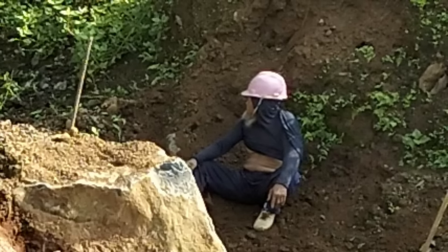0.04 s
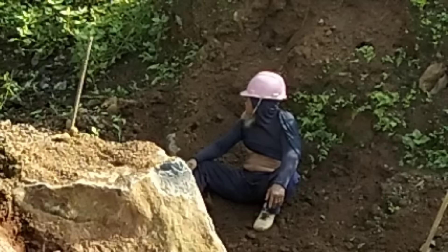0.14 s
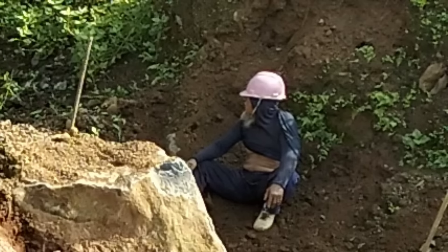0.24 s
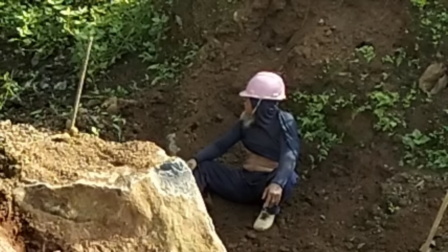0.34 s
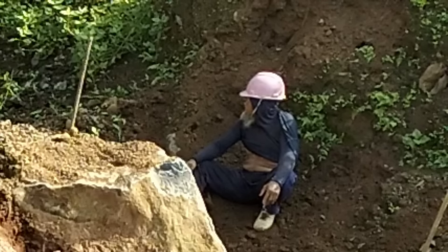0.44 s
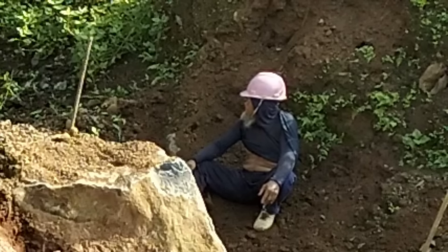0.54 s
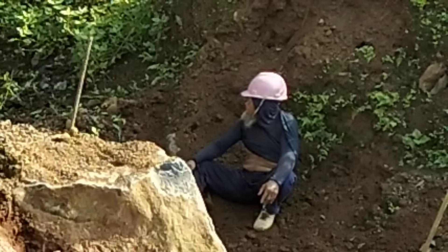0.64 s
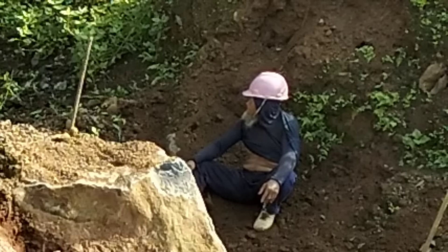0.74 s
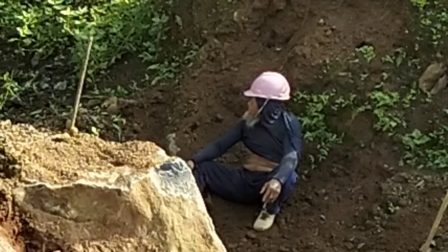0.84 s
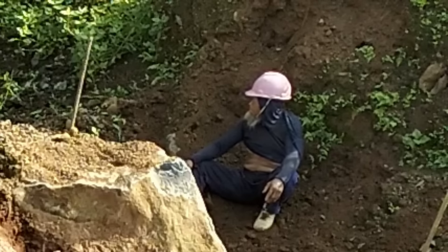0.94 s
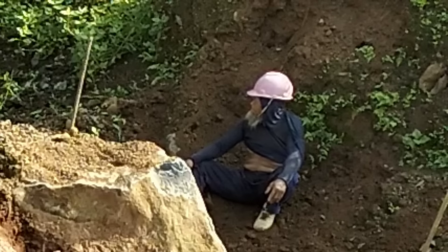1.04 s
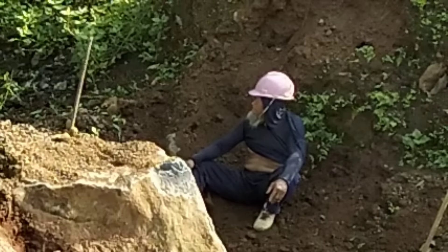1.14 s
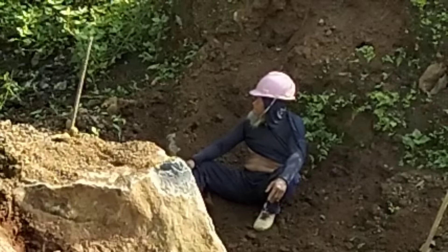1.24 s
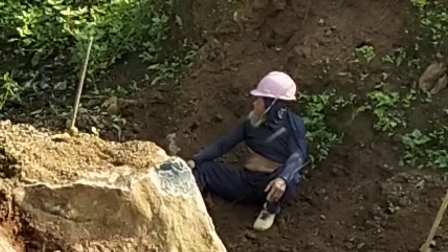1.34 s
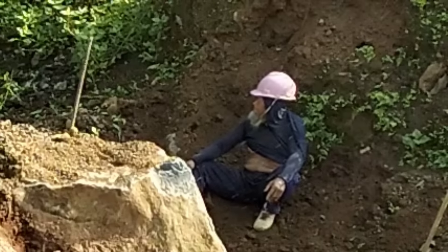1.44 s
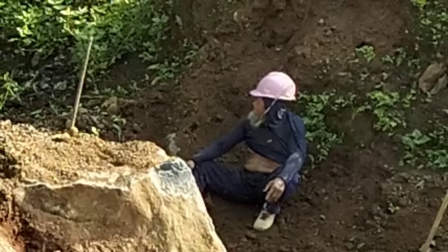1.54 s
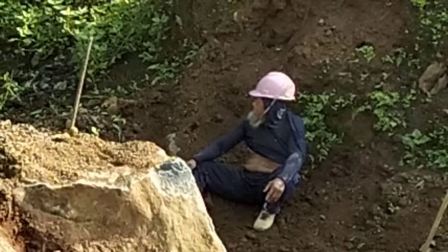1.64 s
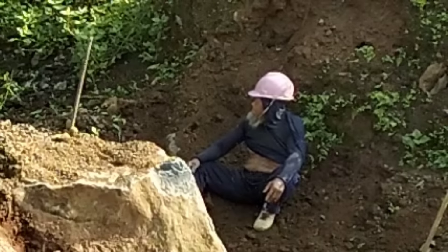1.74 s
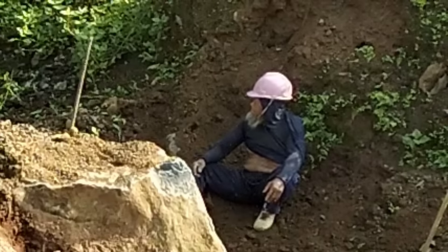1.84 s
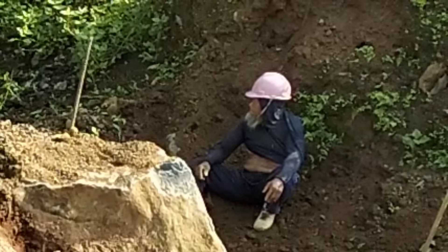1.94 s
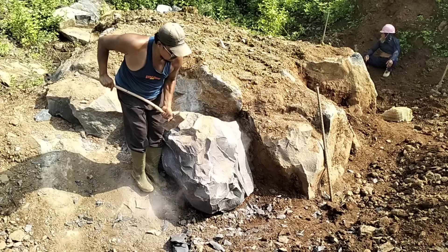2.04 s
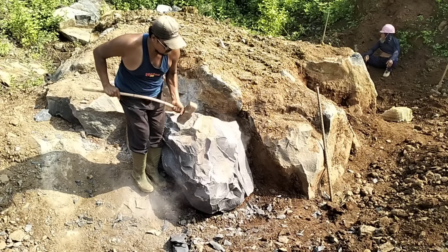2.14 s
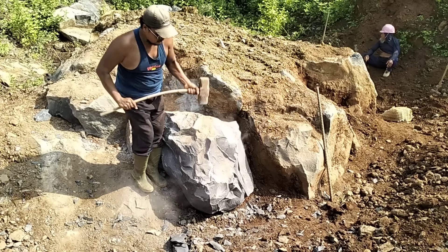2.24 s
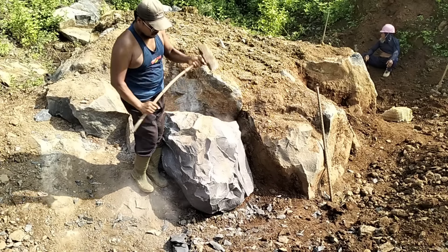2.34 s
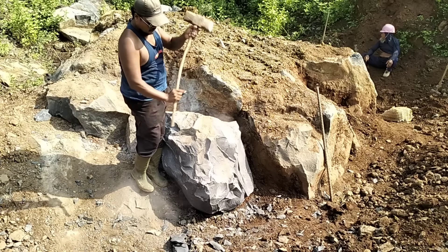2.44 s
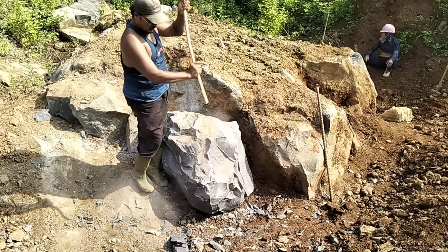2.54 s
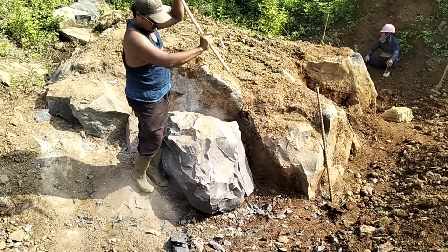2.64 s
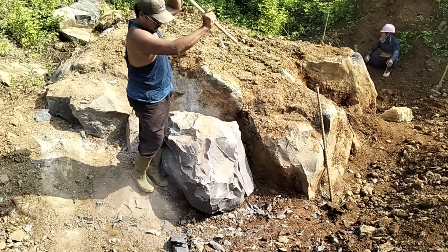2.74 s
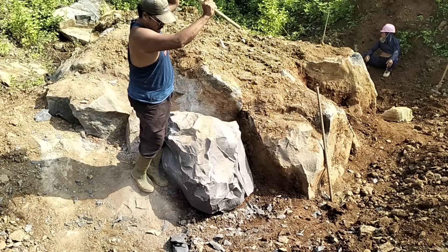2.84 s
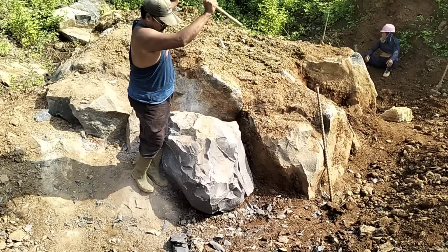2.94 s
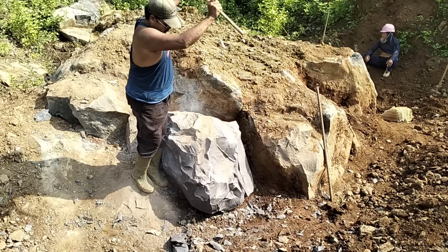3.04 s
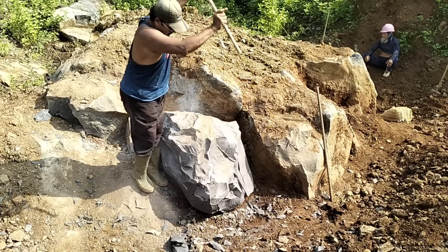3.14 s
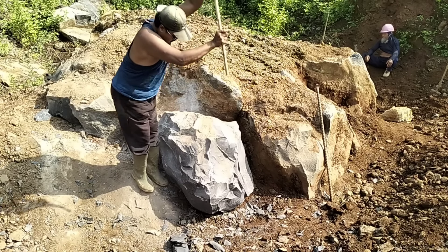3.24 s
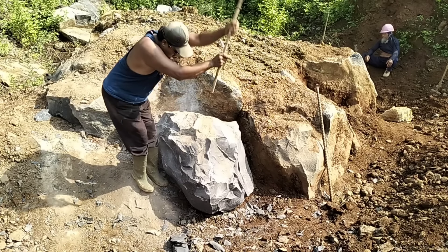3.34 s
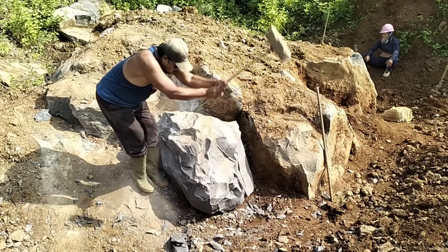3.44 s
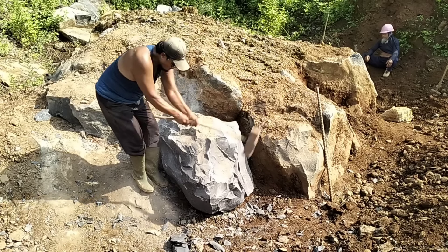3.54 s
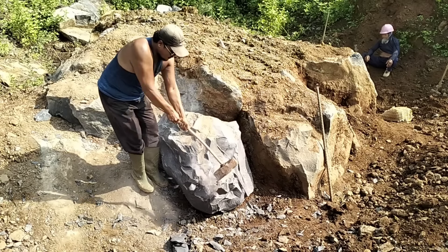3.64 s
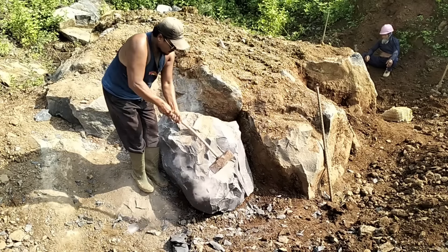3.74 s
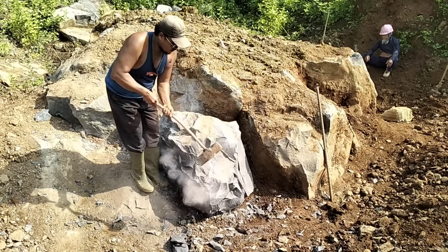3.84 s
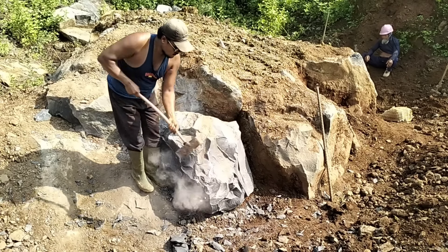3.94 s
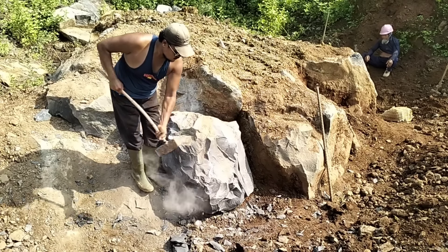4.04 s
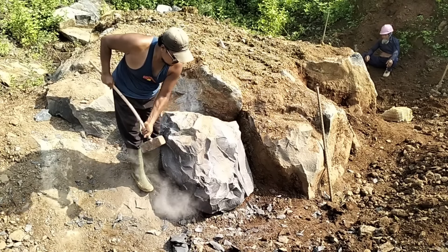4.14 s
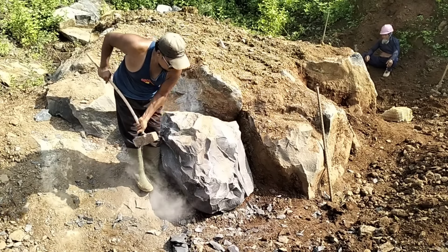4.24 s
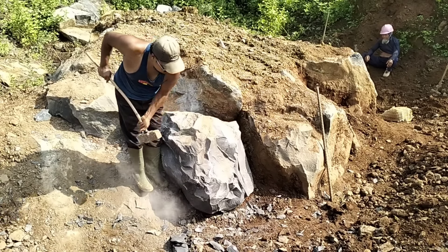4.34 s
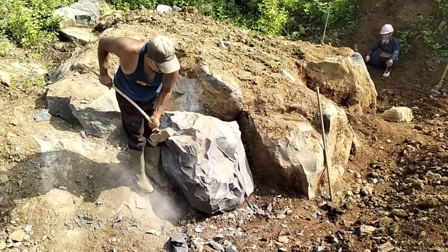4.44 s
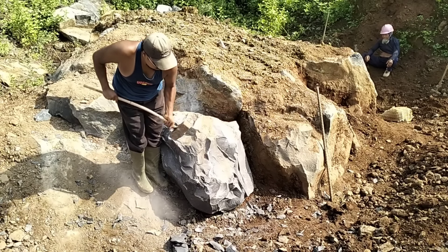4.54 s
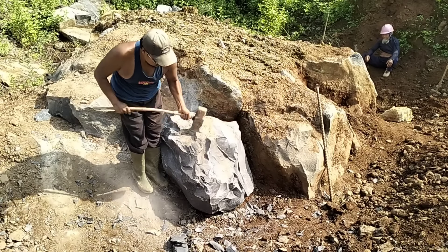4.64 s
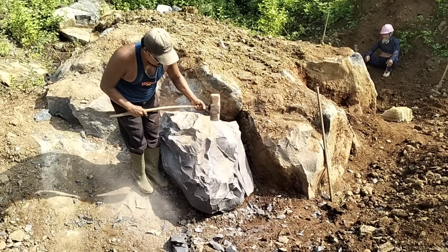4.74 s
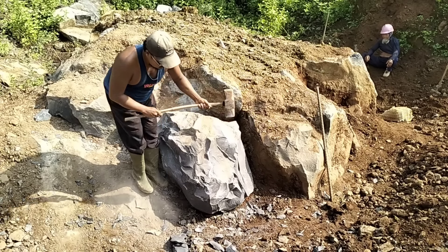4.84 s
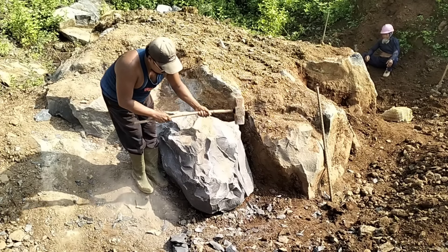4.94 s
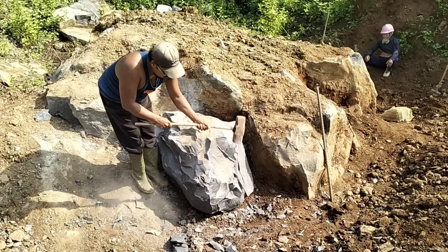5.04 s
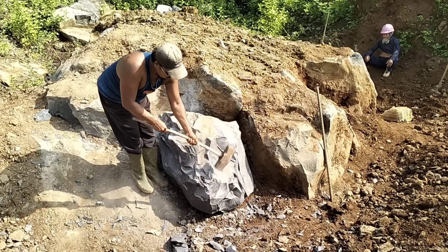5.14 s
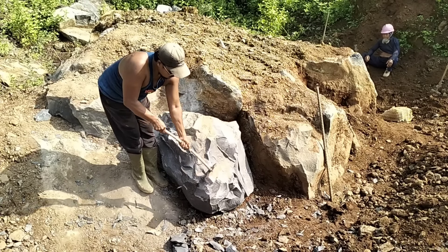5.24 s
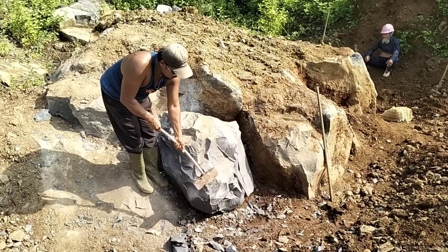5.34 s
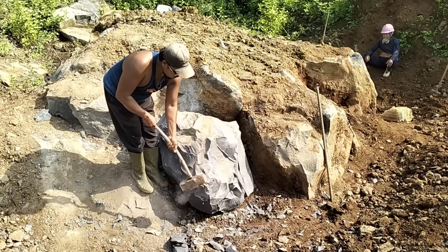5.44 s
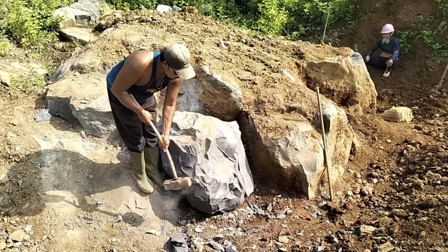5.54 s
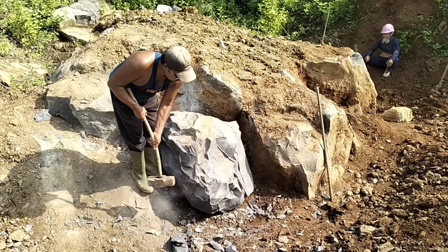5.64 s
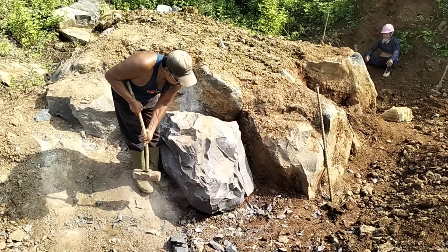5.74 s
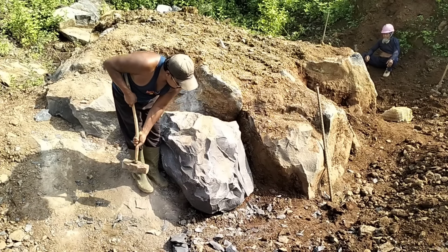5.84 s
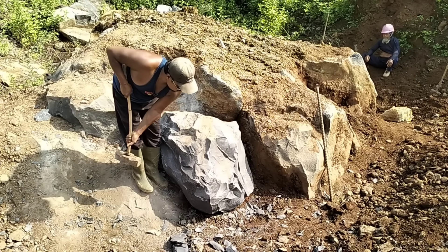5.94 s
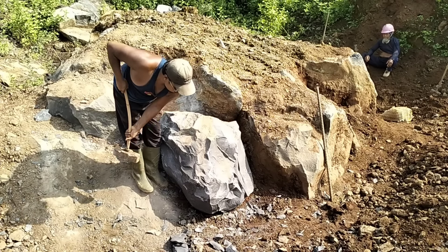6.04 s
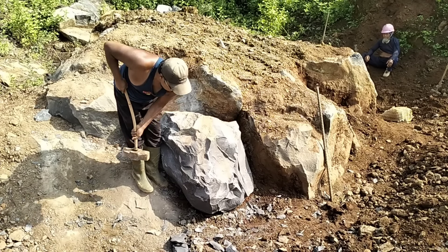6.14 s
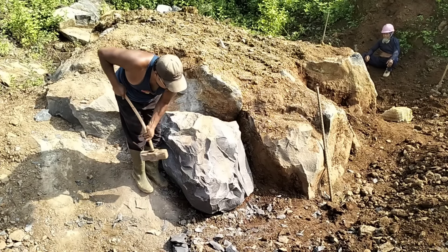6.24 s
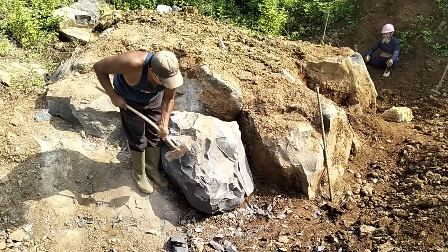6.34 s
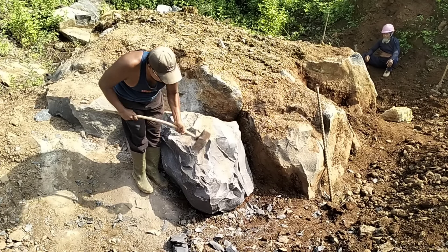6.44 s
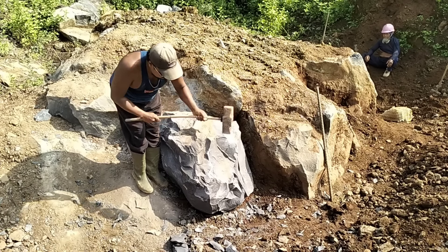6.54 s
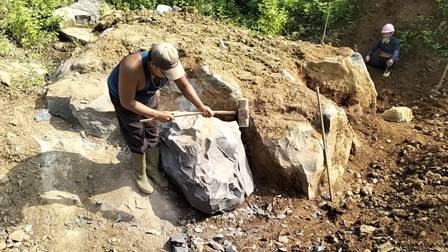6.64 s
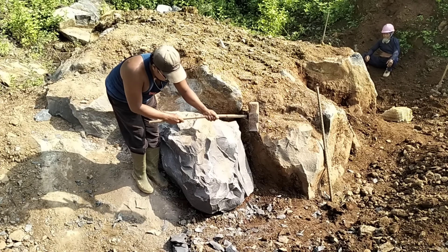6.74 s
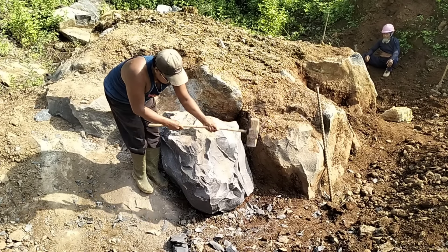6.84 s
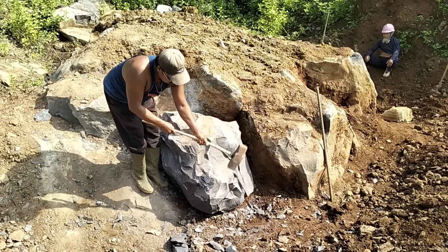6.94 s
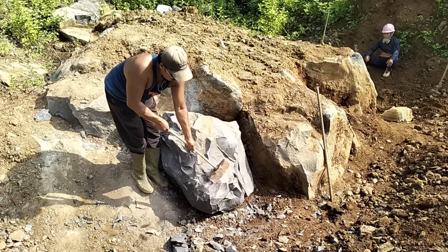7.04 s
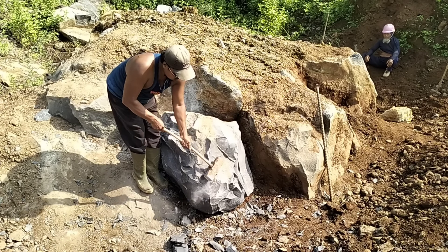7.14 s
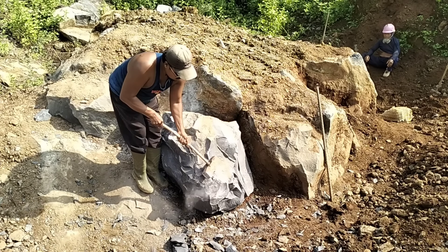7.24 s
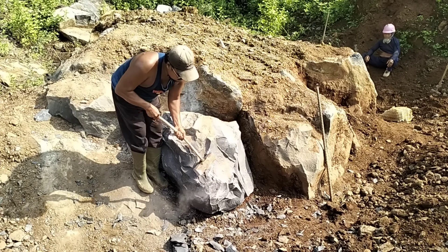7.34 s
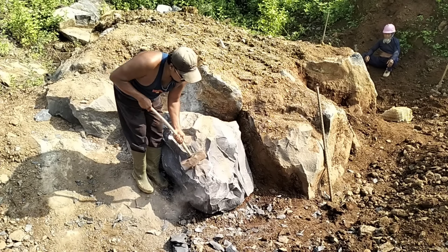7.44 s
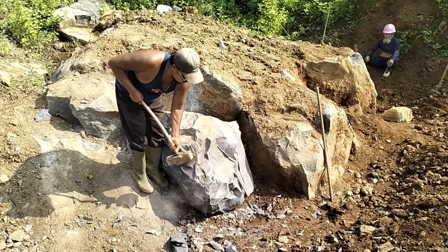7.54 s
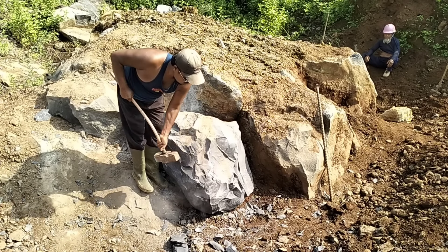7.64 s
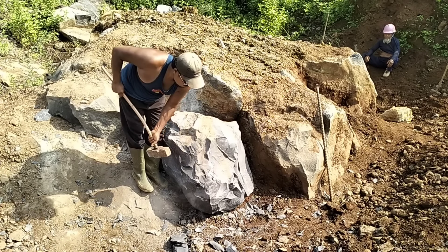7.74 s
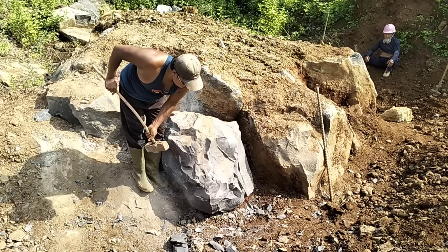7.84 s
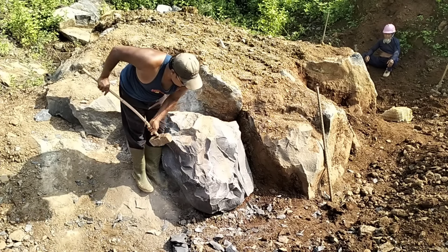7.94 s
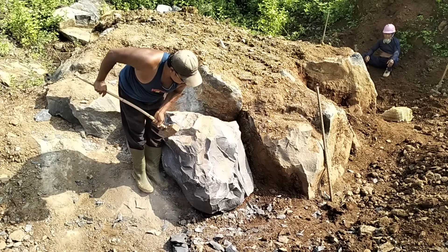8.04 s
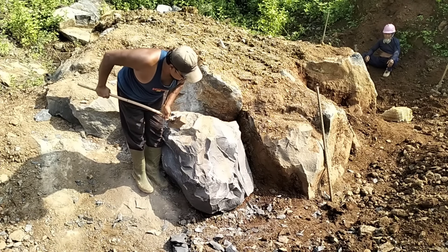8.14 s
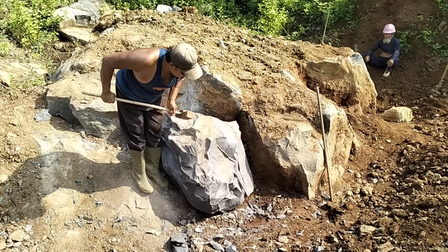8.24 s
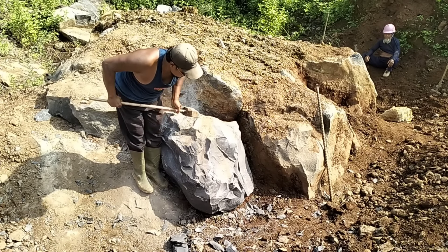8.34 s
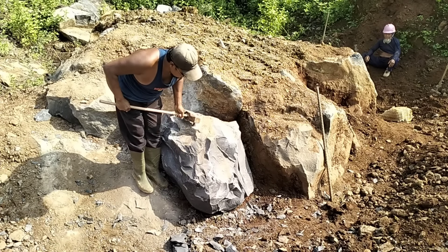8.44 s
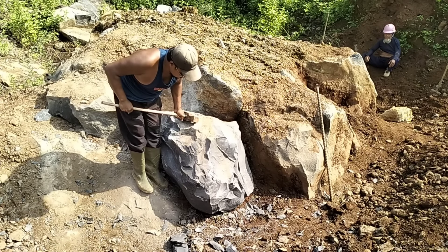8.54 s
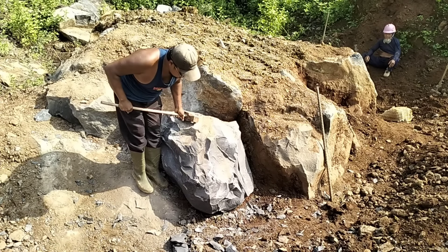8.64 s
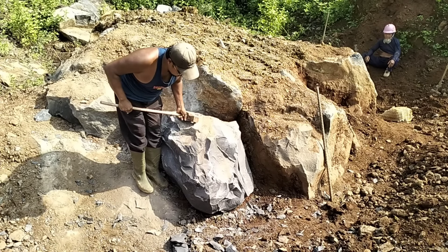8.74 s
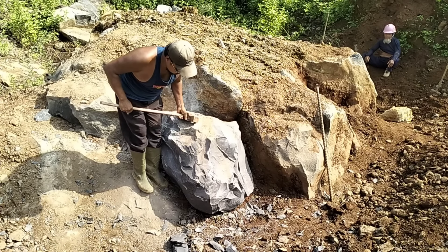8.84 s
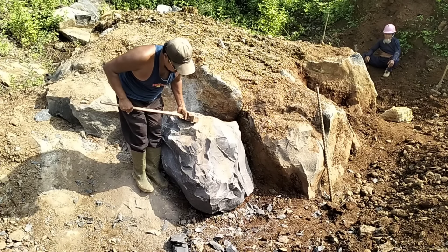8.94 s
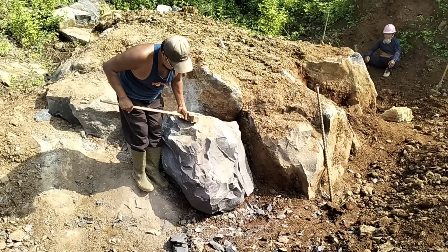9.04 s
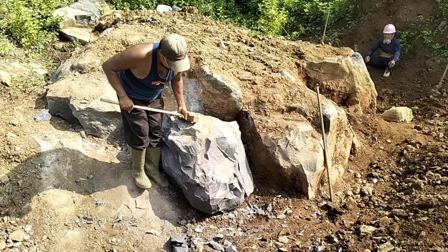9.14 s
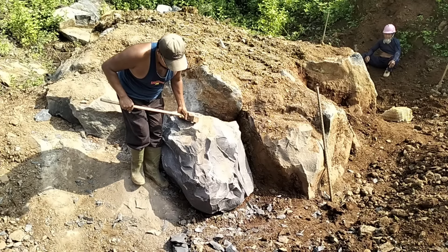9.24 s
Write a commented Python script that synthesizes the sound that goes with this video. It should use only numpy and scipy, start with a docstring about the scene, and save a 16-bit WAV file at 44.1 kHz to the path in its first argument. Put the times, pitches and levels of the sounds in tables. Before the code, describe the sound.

Sledgehammer strikes a boulder outdoors in hard, separate, distorting blows with crunching chips and brief steel ring, over steady cicada hiss and a soft cooing bird.

```python
"""An earth slope with a boulder on it, struck by a sledgehammer, with a rock face further off.
Blows: jagged noise forces drive stone resonances; noise crushes and patters; sines thud and ring as steel.
Falling chips tick and knock through noisy resonances; swings swish and grit slides in swells of noise.
All round, two bands of noise hiss as far cicadas, a bird coos in gliding sines, and something rumbles
far away. Delayed noise tails echo off the slope, and the microphone clips on the blows."""
import sys
import numpy as np
from scipy import signal
from scipy.fft import rfft, irfft, next_fast_len
from scipy.io import wavfile
from scipy.ndimage import uniform_filter1d, map_coordinates

SR = 44100
rng = np.random.default_rng(int(sys.argv[2]) if len(sys.argv) > 2 else 0)


def inscribe(sig):
    """Save sig as 16-bit PCM at rate SR to the path in sys.argv[1].

    A 1-D sig is mono; a 2-D sig holds one channel per row.
    Samples are clipped to [-1, 1] before scaling.
    """
    pcm = np.round(np.clip(np.atleast_2d(sig).T, -1, 1) * 32767)
    wavfile.write(sys.argv[1], SR, pcm.astype(np.int16))


N = 409688
T = np.arange(SR // 2) / SR  # time after a contact, s


def amp(db):
    """Gain of a level in dB."""
    return 10 ** (np.asarray(db) / 20)


def unit(x):
    """x at rms 1."""
    return x / np.sqrt(np.mean(x ** 2, axis=-1, keepdims=True) + 1e-20)


def along(points, hz):
    """Points of (f/Hz, value) read on a log frequency axis."""
    f, v = np.transpose(points)
    return np.interp(np.log(hz + 1), np.log(f + 1), v)


def curves(rows):
    """One value per sample for each column after the time."""
    s, *cols = np.transpose(rows)
    return [np.interp(np.arange(N) / SR, s, c) for c in cols]


def wobble(rate):
    """A smooth random curve, rate knots a second."""
    knots = rng.standard_normal(int(N * rate / SR) + 4)
    return map_coordinates(knots, [np.arange(N) * rate / SR])


def filtered(x, response):
    """x times a complex response of frequency."""
    n = x.shape[-1]
    m = next_fast_len(n + SR // 4)
    return irfft(rfft(x, m) * response(np.fft.rfftfreq(m, 1 / SR)), m)[..., :n]


def resonated(x, hz, width_hz):
    """x through one resonance."""
    return filtered(x, lambda f: 1j * f * width_hz / (hz * hz - f * f + 1j * f * width_hz))


def patchy_noise(spectrum, alike, patchy_db):
    """Stereo noise, its centre at rms 1, with patches of random gain over time and frequency."""
    z = signal.stft(rng.standard_normal((2, N)), nperseg=512)[2]
    field = rng.standard_normal(z.shape)
    field = uniform_filter1d(uniform_filter1d(field, size=8, axis=1), size=12, axis=2)
    a, b = signal.istft(z * amp(patchy_db * field / field.std()), nperseg=512)[1][:, :N]
    # alike sets the correlation of the two sides
    angle = np.arccos(np.clip(alike, -1, 1)) / 2
    left = np.cos(angle) * a + np.sin(angle) * b
    right = np.cos(angle) * a - np.sin(angle) * b
    pair = filtered(np.array([left, right]), lambda hz: amp(along(spectrum, hz)))
    return pair / pair.mean(axis=0).std()


def add(track, s, sound):
    """Lays sound into track from s seconds on."""
    part = track[..., round(s * SR):][..., :sound.shape[-1]]
    part += sound[..., :part.shape[-1]]


# spectra of the two kinds of singer: f/Hz, relative level/dB
LOW_SPECTRUM = [(1000, -60.5), (1700, -32), (2360, -6.5), (2790, -1), (4870, 1.5), (8200, -6), (10700, -33),
                (18000, -120)]
HIGH_SPECTRUM = [(6000, -34.5), (8000, -12.5), (9700, 2), (11800, -3), (13700, -10), (14200, -24.5),
                 (14500, -73.5)]
# swell of the high chorus: t/s, level/dB
HIGH_SWELL = [(0, -38), (3, -35.5), (6.8, -36.5), (9.29, -37.5)]
# dips of the hiss after a blow: t/s, depth/dB, recovery/s
HISS_LULLS = [(1.38, 3, .7), (3.74, 3.5, 0.93), (5.4, 1.5, 0.36)]
LOW_CHORUS_DB, LULL_FALL_S = -34, 0.069


def cicadas():
    """Far singers blur into two bands of hiss; the upper swells on its own and both dip together."""
    high_db, = curves(HIGH_SWELL)
    lull_db = 0
    for s, depth_db, back in HISS_LULLS:
        after = np.maximum(np.arange(N) / SR - s, 0)
        lull_db = lull_db - depth_db * (1 - np.exp(-after / LULL_FALL_S)) * np.exp(-(after / back) ** 2)
    low = amp(LOW_CHORUS_DB) * patchy_noise(LOW_SPECTRUM, alike=0.028, patchy_db=1.18)
    high = amp(high_db + 0.27 * wobble(8)) * patchy_noise(HIGH_SPECTRUM, alike=.02, patchy_db=2.0)
    return amp(lull_db) * (low + high * amp([[-1.2], [1.2]]))


# swell of the far rumble: t/s, level/dB
RUMBLE_SWELL = [(0, -53.5), (5.2, -52), (5.5, -54.5), (9.29, -58)]
# spectra of the rumble and of the air: f/Hz, relative level/dB
RUMBLE_SPECTRUM = [(14, -48.5), (41, -9.5), (75, -5), (135, -2.5), (201, -14), (340, -57), (570, -120)]
AIR_SPECTRUM = [(150, -28.5), (250, -0.5), (1030, -8.5), (1900, -4.5), (2500, -39)]
AIR_DB = -63


def background():
    """Low-band noise rumbles far away under a faint, wide wash of air."""
    rumble_db, = curves(RUMBLE_SWELL)
    rumble = amp(rumble_db) * patchy_noise(RUMBLE_SPECTRUM, alike=.8, patchy_db=1.2)
    return rumble + amp(AIR_DB) * patchy_noise(AIR_SPECTRUM, alike=.06, patchy_db=2.5)


# notes of one phrase: t after its start/s, length/s, start f/Hz, end f/Hz, level before the mix/dB
BIRD_NOTES = [(.01, 0.075, 1015, 1050, -53), (0.092, 0.032, 1047, 1032, -52),
              (0.145, 0.0322, 1030, 1021, -56), (0.223, 0.033, 1063, 1027, -52),
              (.325, .055, 1050, 1165, -55), (.4, 0.12, 1140, 1110, -62.5), (0.565, .065, 1000, 1110, -54),
              (.635, .09, 1010, 1130, -61)]
# phrases: t/s, notes sung
BIRD_PHRASES = [(.685, 7), (3.345, 5), (5.825, 8)]


def bird():
    """A phrase of soft gliding whistles, sung a little differently and to a different length each time."""
    out, waver = np.zeros(N), wobble(40)
    chance = rng.standard_normal((len(BIRD_PHRASES), len(BIRD_NOTES), 2))
    for (start, count), draws in zip(BIRD_PHRASES, chance):
        for note, (louder, sharper) in zip(BIRD_NOTES[:count], draws):
            after, length, start_hz, end_hz, db = note
            u = np.arange(round(length * SR)) / (length * SR)
            pitch = start_hz + (end_hz - start_hz) * np.sin(np.pi * u / 2) ** 2
            drift = waver[round((start + after) * SR):][:len(u)]
            sung = pitch * (1 + .005 * sharper + .007 * drift)
            whistle = np.sin(np.pi * u) ** 0.41 * np.sin(2 * np.pi * np.cumsum(sung) / SR)
            add(out, start + after, amp(db + 0.97 * louder) * whistle)
    return out * amp(2.5 * wobble(45))


# echo of the hillside: f/Hz, t60/s
SLOPE_DECAY = [(100, .26), (600, .2), (2000, .15), (10000, .1)]


def hillside(x, delay):
    """A delayed noise tail answers x, each frequency dying at its own speed."""
    hz, t, z = signal.stft(rng.standard_normal((2, SR // 2)), SR, nperseg=256)
    fading = amp(-60 * t / along(SLOPE_DECAY, hz)[:, None])
    tail = signal.istft(z * fading, SR, nperseg=256)[1]
    late = np.pad(x.mean(axis=0), (round(delay * SR), 0))
    return signal.fftconvolve(late[None], tail / np.linalg.norm(tail[0]), axes=1)[:, :N]


def struck(force, hz, db, t60):
    """One mode driven by a force, peaking at db."""
    mode = resonated(force, hz, np.log(1000) / (np.pi * t60))
    return amp(db) * mode / np.abs(mode).max()


def ringing(modes, rise):
    """Damped modes that all start together and swell over rise seconds."""
    tones = sum(amp(db - 60 * T / t60) * np.sin(2 * np.pi * hz * T) for hz, db, t60 in modes)
    return (1 - np.exp(-T / rise)) * tones


SPLINTERS = 14  # pieces that break off at each blow
SPLINTER_HZ, SPLINTER_OCTAVES, SPLINTER_T60_S = 3640, 1.8, 0.0056  # middle pitch, spread, ring
BREAKING = 2.3  # span of the snapping, in contact times


def splinters(bits, contact):
    """Flakes snap off at scattered moments, each with a short note of its own."""
    when, pitch, size, side = bits.T[..., None]
    t = np.maximum(T[:SR // 8] - BREAKING * contact * when, 0)
    hz = SPLINTER_HZ * 2 ** (SPLINTER_OCTAVES * (pitch - .5))
    notes = amp(-12 * size - 60 * t / SPLINTER_T60_S) * np.sin(2 * np.pi * hz * t)
    left = (notes * amp(3 - 6 * side)).sum(axis=0)
    right = (notes * amp(6 * side - 3)).sum(axis=0)
    return np.pad(np.array([left, right]), ((0, 0), (0, len(T) - SR // 8)))


# blows: t/s, contact/s, lowest knock f/Hz, middle knock f/Hz, edge f/Hz, then levels/dB: slab, knock,
# (knock brightness, dB per octave), clack, crush, dust, thud, ground, lead-in noise, steel families 1, 2, 3
HAMMER_BLOWS = [(1.3401, 0.01, 578, 717.5, 1475, -21, 0, -1, -6.5, -14.5, -17, -7.5, 3, -24.5, -15.5, -37.5, -8.5),
                (3.7170, 0.0029, 623, 1130, 1746, -28.5, 7, -1.5, 2.5, -15, -16.5, -9, -28.5, -21.5, -18.5, -20.5, -25),
                (5.2968, 0.0067, 563, 1148, 1864, -35, -4, -8.5, -7.5, -4.5, -34, -14, -37.5, -42, -29.5, -32, -44),
                (5.355, 0.0039, 592, 1084, 1780, -10.5, 1.5, 7.5, 1, -17, -31, -22, -36, -38.5, -25, -39, -42.5),
                (7.156, 0.0036, 590, 810, 1976, -29.5, -1, -7.5, -6.5, -1.5, -24.5, -5.5, -44, -34, -18.5, -20.5, -19),
                (7.168, 0.0041, 557, 796, 1768, -19.5, -10, -6.5, -9.5, -10.5, -39.5, -32, -41.5, -63, -37.5, -46, -25),
                (8.6039, 0.0082, 480, 835, 1110, -51.5, -5, 3.5, -8.5, -24.5, -39.5, -11, -45, -29.5, -41, -30, -34)]
# lowest and middle knock, pitched by the spot struck: relative level/dB, t60/s
STONE_KNOCKS = [(-5, 0.014), (-6.5, 0.012)]
# a loose slab rings on: f/Hz, relative level/dB, t60/s
SLAB_MODES = [(1690, -1, .09), (1400, 0, .075)]
# crushed rock: f/Hz, relative level/dB
GRIT_SPECTRUM = [(300, -21.5), (1000, -7), (2500, -2.5), (6000, -9.5), (10000, -5.5), (16000, -16.5)]
# body of the boulder: f/Hz, relative level/dB, t60/s
BOULDER_MODES = [(114, 5, 0.13), (180, -2, 0.1), (301, -4, 0.072)]
# soft earth under the boulder: f/Hz, t60/s
EARTH_MODE = (48, 0.071)
# steel head, three families driven differently by where the face lands: f/Hz, relative level/dB, t60/s
STEEL_FAMILIES = [
    [(5329, 0, .14)],
    [(6370, 0, .22), (13900, -5, .15)],
    [(9296, 0, .22), (9360, -5, .19), (8650, -4, .09), (6866, -7, .17), (11230, -10, .22), (3960, 3, .045),
     (3300, 3, .04)],
]
EDGE_T60_S = 0.012  # a thin edge of the stone clacks briefly
PIVOT_HZ = 900  # knock brightness turns about this pitch
SPLINTER_DB = -5.5  # over the crush
TOSSED_S, TOSSED_DB = .058, -11  # tossed grit lands again: flight, level over the dust
TOSSED_HZ, TOSSED_T60_S = 692, .35
STEEL_WAVER_DB = 3.5  # slow random level waver of the steel ring, rms
LEAD_IN_HZ, LEAD_IN_GROWS_S = 850, 0.0067  # brief noise swell just before each contact


def hammer():
    """Each blow knocks and crushes the stone, shakes boulder and ground, and rings the steel."""
    out = np.zeros((2, N))
    noise = rng.standard_normal((len(HAMMER_BLOWS), 7, len(T)))
    shards = rng.random((len(HAMMER_BLOWS), SPLINTERS, 4))
    for blow, z, bits in zip(HAMMER_BLOWS, noise, shards):
        s, contact, low_hz, mid_hz, edge_hz, slab_db, knock_db, bright, clack_db, *rest = blow
        crush_db, dust_db, thud_db, ground_db, lead_in_db, *steel_db = rest
        pressing = np.exp(-(T / contact) ** 2)
        # one jolt, then a jagged force while the face grinds in, a little different on each side
        force = (z[0] + 0.36 * z[4:6]) * pressing
        force[:, 4] = 8
        force = uniform_filter1d(force, size=9)
        clack = struck(force, edge_hz, clack_db, EDGE_T60_S)
        stone = clack + amp(slab_db) * sum(struck(force, *mode) for mode in SLAB_MODES)
        # the bulk of the stone feels only the slower part
        push = uniform_filter1d(force, size=14, mode="constant")
        for hz, (db, t60) in zip((low_hz, mid_hz), STONE_KNOCKS):
            tilt_db = bright * np.log2(hz / PIVOT_HZ)
            stone = stone + struck(push, hz, knock_db + db + tilt_db, t60)

        grit = unit(filtered(z[1:3] + 0.5 * z[3], lambda f: amp(along(GRIT_SPECTRUM, f))))
        crush = (1 - np.exp(-T / 0.00067)) * amp(crush_db) * pressing * grit
        crush += amp(crush_db + SPLINTER_DB) * splinters(bits, contact)
        # broken bits patter down unevenly, duller than the crack
        uneven_db = 1.7 * unit(uniform_filter1d(z[0], size=150))
        patter = amp(dust_db - 60 * T / 0.13 + uneven_db)
        crush += patter * unit(resonated(grit[:, ::-1], 1600, 3400))
        late = np.maximum(T - TOSSED_S, 0)
        uneven_db = 2.5 * unit(uniform_filter1d(z[3], size=300))
        shower = amp(dust_db + TOSSED_DB - 60 * late / TOSSED_T60_S + uneven_db)
        shower = shower * (1 - np.exp(-late / 0.017))
        crush += shower * unit(resonated(z[4:6, ::-1] + z[6], TOSSED_HZ, 1500))

        thud = amp(thud_db) * ringing(BOULDER_MODES, rise=0.0098)
        # the earth yields slowly, its phase set back differently on each side
        earth_hz, earth_t60 = EARTH_MODE
        ground = amp(ground_db - 60 * T / earth_t60) * (1 - np.exp(-T / 0.006))
        ground = ground * np.sin(2 * np.pi * earth_hz * (T - np.array([[.0085], [.005]])))
        steel = 0
        for level, family, draw in zip(steel_db, STEEL_FAMILIES, z[1:4, ::-1]):
            waver = unit(uniform_filter1d(uniform_filter1d(draw, size=400), size=400))
            steel = steel + amp(level + STEEL_WAVER_DB * waver) * ringing(family, rise=0.0099)
        add(out, s, stone + crush + thud + ground * amp([[-4], [4]]) + steel * amp([[-1.5], [1.5]]))
        # the lead-in swells up to the contact and stops there
        lead_in = unit(resonated(z[6], LEAD_IN_HZ, LEAD_IN_HZ)) * np.exp(-T / LEAD_IN_GROWS_S)[::-1]
        add(out, s - len(T) / SR, amp(lead_in_db) * lead_in)
    return out


def knock(noise, hz, t60, width):
    """A jolt and a dying scrape of rough contact through a resonance, width as a share of its pitch."""
    scrape = unit(resonated(noise, hz, width * hz)) * amp(-60 * T / t60) * (1 - np.exp(-T / 0.00029))
    push = np.cos(2 * np.pi * hz * T) * np.exp(-1.5 * width * hz * T) * (1 - np.exp(-4 * hz * T))
    return 0.81 * scrape + 1.2 * push


# short ticks and knocks, one just ahead of a blow: t/s, level/dB, f/Hz, snap level over the tick/dB
TICKS = [(1.799, -47, 377, -11.5), (1.947, -37, 605, 0.5), (3.7129, -19, 1000, -15.5),
         (4.032, -26.5, 386, 7), (4.054, -26, 2094, -5.5), (4.069, -38, 3540, 0), (4.123, -39.5, 660, 3),
         (4.23, -34.5, 3790, 0), (4.446, -34, 550, 3), (4.688, -32.5, 560, 8), (5.053, -35.5, 1200, -3.5),
         (5.303, -10, 2100, -6), (5.56, -37.5, 524, -10), (7.394, -29, 514, -3.5), (7.5445, -16, 1787, -13),
         (7.5493, -15.5, 2000, -21.5), (7.556, -22.5, 2880, -8), (7.5563, -15, 590, -13.5),
         (7.56, -22.5, 100, -32), (7.707, -36.5, 1140, -6), (7.733, -32.5, 1260, -7),
         (7.8332, -27.5, 643, -5), (7.843, -25, 400, -17.5), (8.626, -26, 1450, -20)]
LUMP_T60_S, LUMP_HZ, SHORTENS = 0.05, 501, 0.36  # ring at that pitch; power by which higher ones die sooner
PING_HZ, PING_T60_S = 3000, .065  # ticks above this pitch are narrow, ringing pings
SNAP_HZ, SNAP_T60_S = 2680, 0.011  # the hard edge of a knock


def chips():
    """Short ticks and knocks: among the knocks the lower ones ring longer, and each snaps; the highest ticks
    are narrow, ringing pings."""
    out = np.zeros((2, N))
    noise = rng.standard_normal((len(TICKS), 2, len(T)))
    sides = rng.normal(0, 1.5, len(TICKS))
    for (s, db, hz, snap_db), z, side in zip(TICKS, noise, sides):
        if hz > PING_HZ:
            tick = knock(z[0], hz, PING_T60_S, width=0.0062)
        else:
            tick = knock(z[0], hz, LUMP_T60_S * (LUMP_HZ / hz) ** SHORTENS, width=0.77)
            tick = tick + amp(snap_db) * knock(z[1], SNAP_HZ, SNAP_T60_S, width=0.44)
        add(out, s, tick * amp([[db + side], [db - side]]))
    return out


# soft swishes of the swing before a blow, grit sliding and the boulder rocking:
# t/s, length/s, level/dB, f/Hz
SWISHES_AND_SLIDES = [(3.516, 0.085, -51, 590), (3.66, 0.082, -50.5, 1016), (4.031, 0.1, -47, 540),
                      (4.195, 0.028, -31.5, 2450), (4.202, 0.016, -26.5, 12680), (7.298, 0.26, -44.5, 90),
                      (7.376, 0.26, -51, 830)]


def swishes_and_slides():
    """Uneven noise swells and fades without a sharp start, in a narrower band when high."""
    out = np.zeros((2, N))
    noise = rng.standard_normal((len(SWISHES_AND_SLIDES), 3, len(T)))
    for (s, length, db, hz), z in zip(SWISHES_AND_SLIDES, noise):
        uneven_db = 2.0 * unit(uniform_filter1d(z[2, ::-1], size=200))
        grains = (z[:2] + 1.9 * z[2]) * amp(uneven_db)
        u = 3 * T / length  # the swell crests a third of the way in
        swell = (u * np.exp(1 - u)) ** 2
        width = (.9 if hz < 3000 else .14) * hz
        band = resonated(resonated(grains, hz, width), hz, 2 * width)
        add(out, s, amp(db) * swell * unit(band))
    return out


NEAR_S, NEAR_DB = .0064, -18  # the slope behind: delay, level
FACE_S, FACE_DB = .075, -24  # a rock face further off: delay, level
SCATTER_HZ, SCATTER_RATE = 300, 900  # broken ground blurs echoes above this pitch, at so many knots a second


def scene():
    """Work in front with its echoes, animals and distance behind."""
    work = hammer() + chips() + swishes_and_slides()
    song = bird() * amp([[-1], [1]])
    far_song = amp(-2) * song + amp(-4) * hillside(song, NEAR_S)
    deep = filtered(work, lambda hz: 1 / (1 + 1j * hz / SCATTER_HZ) ** 2)
    blurred = deep + (work - deep) * unit(wobble(SCATTER_RATE))
    echoes = amp(NEAR_DB) * hillside(blurred, NEAR_S) + amp(FACE_DB) * hillside(deep, FACE_S)
    return work + echoes + far_song + cicadas() + background()


TOP_HZ = 15360  # band limit of the microphone input


def record(dry):
    """The input clips with a rounded knee at full scale and keeps nothing above its band limit."""
    clipped = dry / (1 + np.abs(dry) ** 8) ** (1 / 8)
    return np.clip(filtered(clipped, lambda hz: hz < TOP_HZ), -1, 1)


dry = scene()
out = record(dry)
inscribe(out)
```